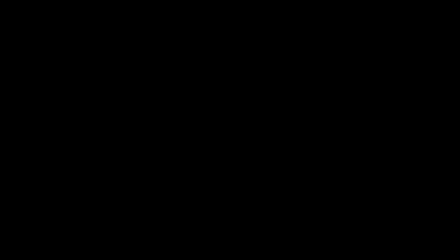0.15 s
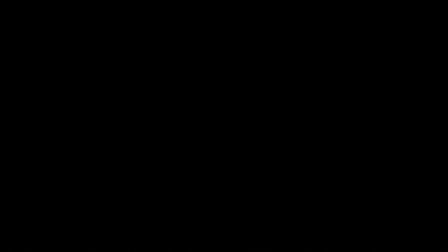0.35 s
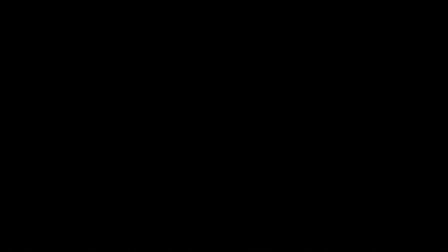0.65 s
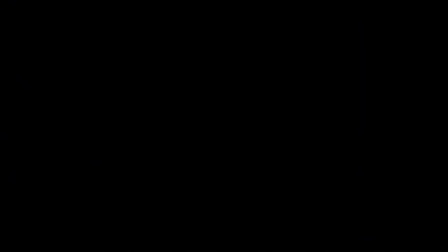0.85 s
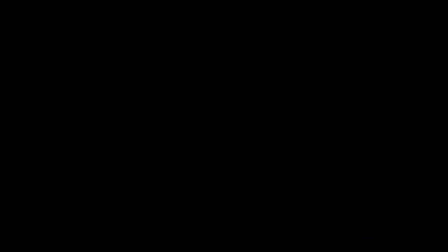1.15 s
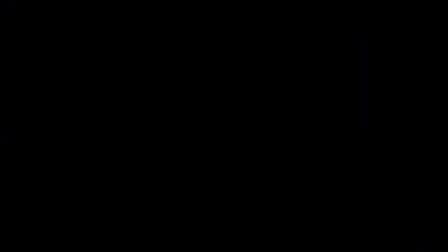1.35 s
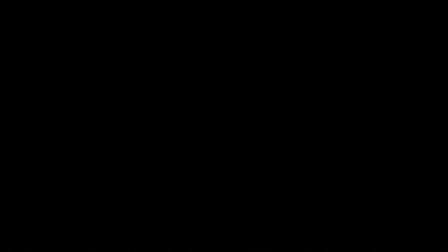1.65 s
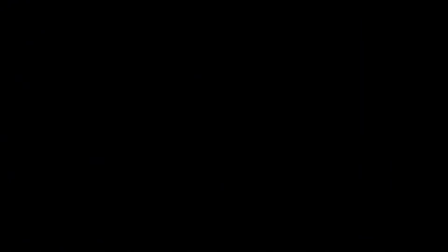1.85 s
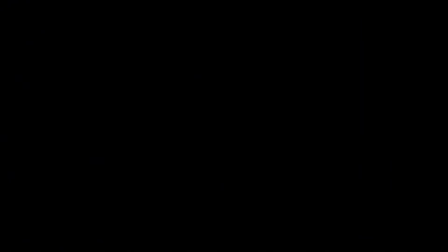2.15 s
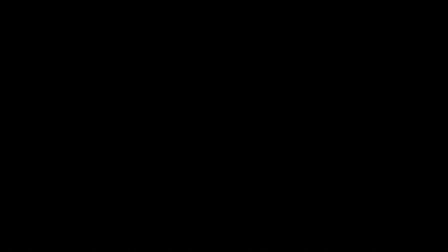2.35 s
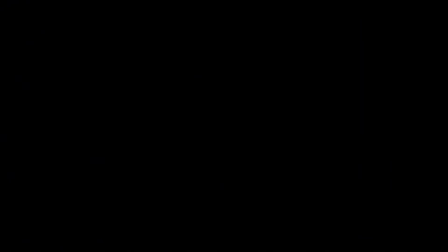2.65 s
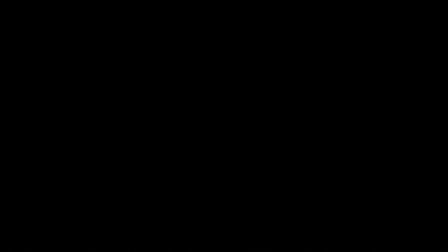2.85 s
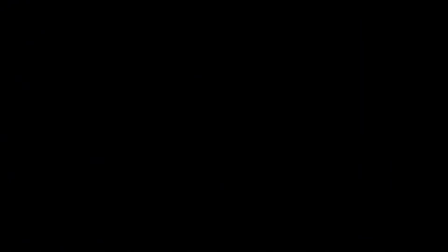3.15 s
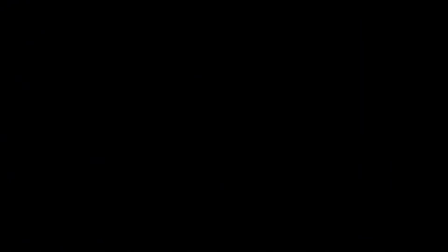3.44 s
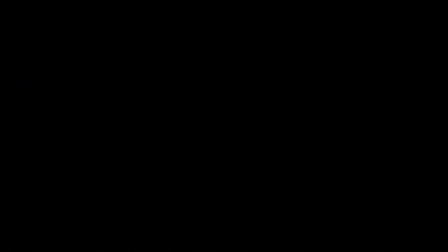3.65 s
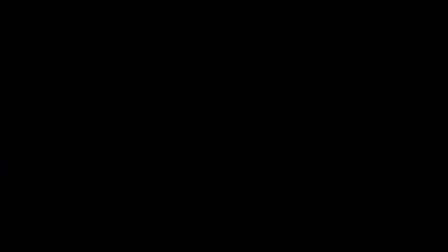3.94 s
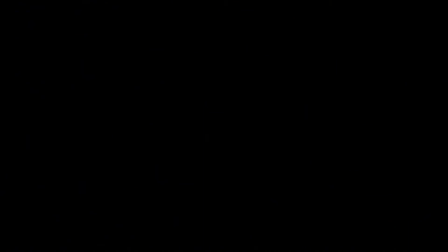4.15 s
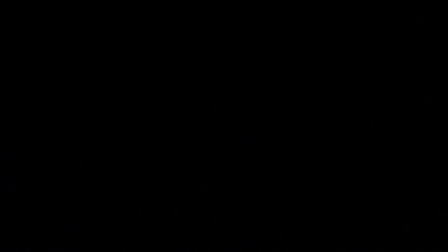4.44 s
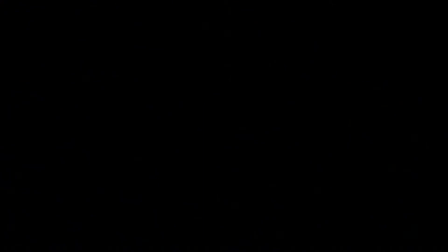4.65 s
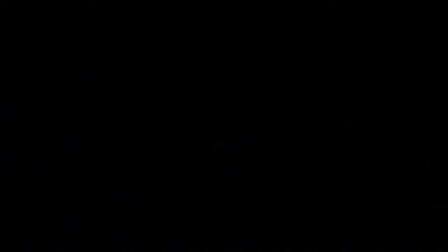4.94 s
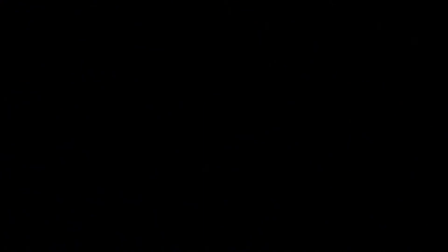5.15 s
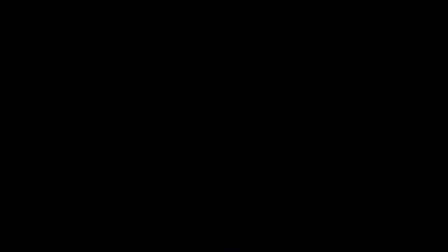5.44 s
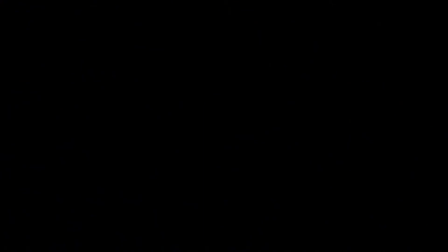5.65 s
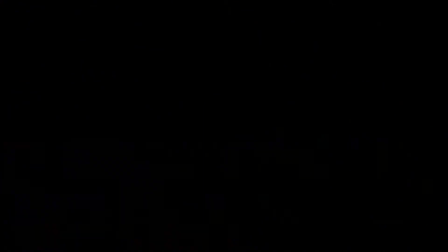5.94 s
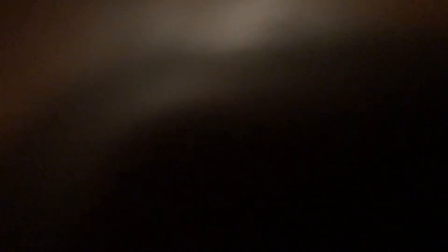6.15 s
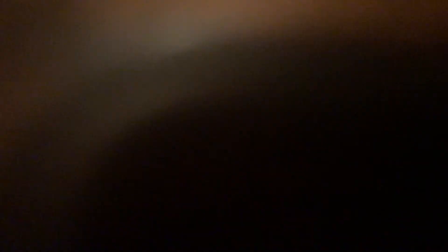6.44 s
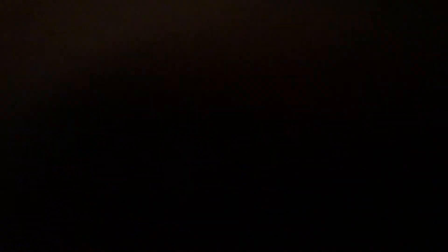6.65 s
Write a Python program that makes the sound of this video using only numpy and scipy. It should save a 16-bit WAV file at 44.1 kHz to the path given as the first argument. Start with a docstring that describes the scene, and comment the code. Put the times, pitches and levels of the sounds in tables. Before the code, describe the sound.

Crisp foil snack packet rustling up close: light crinkles, a hard knock, a brief lull, then bursts of sharp crackling and soft thuds as it opens.

```python
"""A metallized plastic snack bag, handled close to the microphone, then pulled open: its creases snap
one by one, each a click coloured by ringing film, over random finer crackle and sliding hiss.
Early on a knock sets hollow furniture ringing in decaying modes; blows and finger taps are tones that
fall in pitch, some of them soft thuds as the seam gives.
Behind it an appliance hums and rumbles in a small room, over steady noise for the air."""
import sys
import numpy as np
from scipy import signal
from scipy.fft import rfft, irfft
from scipy.io import wavfile

SR = 44100
rng = np.random.default_rng(int(sys.argv[2]) if len(sys.argv) > 2 else 0)


def wrap_up_sound(samples):
    """Save the sound to the file named by the first command line argument, as 16-bit audio."""
    columns = np.atleast_2d(samples).T
    # keep every value between -1 and 1, then stretch to whole-number steps
    tamed = np.clip(columns, -1, 1)
    steps = np.round(tamed * 32767).astype(np.int16)
    wavfile.write(sys.argv[1], SR, steps)


N = 299880
TIME = np.arange(N) / SR
GRAIN_SAMPLES = 1024
GRAIN_HZ = np.fft.rfftfreq(GRAIN_SAMPLES, 1 / SR)
KNOCK_S = .8829


# The loudest creases snapping, close to the microphone. Each row: time in seconds, level of the crack
# in dB, body and fizz in dB relative to the crack, before the trims.
SNAPS = [(0.0652, -24.5, -6, 12.5), (0.098, -30, -2, -1), (0.3165, -33, -11, 9), (0.475, -23.5, 2.5, 2),
         (0.513, -29.5, 8, 9), (0.673, -38, 17.5, 14), (0.8819, -27.5, 17.5, -2), (0.9025, -41, 4, -17),
         (0.9448, -37, 8, -1), (0.9527, -42, 10, -18), (1.269, -56, 15, -15), (1.3137, -25.5, -2, 7),
         (1.4117, -23.5, -9, 7), (1.4467, -24.5, -1, 7), (1.4728, -24.5, 7, 7), (1.4964, -24, -15, 12),
         (1.5669, -26.5, 4, 5), (1.6584, -22.5, 5, -11), (1.8388, -27.5, 4, 3), (1.875, -28, -9, 1),
         (2.126, -17, -9, -11), (2.1371, -22, -2, 1), (2.151, -15.5, 0.5, 5), (2.2422, -29, 5, 3),
         (2.274, -28, -13, -10), (2.3502, -28.5, -13, 12), (2.369, -23.5, -2.5, -8), (2.423, -20, -11, -4),
         (2.4324, -17.5, -14, 5), (2.4553, -23, -9, -10), (2.4645, -18, -2, 1), (2.5214, -18, -21, -15),
         (2.525, -17, -13, 11), (2.617, -19, 0, 6), (2.6811, -22, 1, -1), (2.711, -14.5, -23, 8),
         (2.733, -19, -5, 13.5), (2.856, -17, 1, 6), (2.8719, -17.5, 6, -11), (2.8807, -15, -4, -4),
         (2.9105, -12, -19, 4), (2.9756, -23.5, -2, 12), (3.0323, -24.5, 3, 7), (3.081, -23, -6, 4),
         (3.118, -35, 13, -15), (3.1672, -31, 13.5, -12), (3.2022, -25.5, -3, 7), (3.3867, -26, 17, -6),
         (3.3948, -17.5, 5.5, 1), (3.436, -23.5, -14, 8), (3.4948, -21.5, -18, 14), (3.5054, -25, 7.5, -12),
         (3.5697, -20, -17, 5), (3.588, -18, 4, -15), (3.6, -21.5, -1, 9), (3.6304, -19.5, -2, 0),
         (3.6549, -16, 2, -1), (3.6614, -19.5, 0, 3), (3.7179, -20, -26, -3), (3.725, -18, -6, 6),
         (3.7976, -22.5, 6, -5), (3.9669, -21.5, 5, 6), (4.072, -31, 8, 2), (4.163, -26, -14, -6),
         (4.2057, -21.5, -2, 7), (4.2362, -21.5, 4.5, 5), (4.282, -16.5, -7, 3), (4.3255, -20.5, 7, -3),
         (4.338, -18, 0, 6), (4.4302, -24, -17, -8), (4.436, -23.5, -5, 6), (4.5082, -15, -8, 1),
         (4.528, -21.5, -9, -4), (4.5322, -23.5, 5.5, -2), (4.653, -23, -12, -12), (4.6738, -32, 14, -15),
         (4.7145, -23, -1, -8), (4.762, -37, 18, -17), (4.8224, -36.5, -2, -5), (4.8643, -28, 1, -18),
         (4.876, -32, 8.5, -17), (4.921, -28.5, -11, -9), (5.0295, -29, 6.5, -5), (5.1193, -27.5, 5.5, -7),
         (5.1596, -22.5, 0, -9), (5.168, -24.5, 1, -20), (5.174, -19.5, -14, -1), (5.2201, -20.5, 6, -2),
         (5.256, -17.5, -3, 4), (5.2823, -22.5, 0, 1), (5.3228, -15.5, -12, 11), (5.3354, -16.5, 3, 6),
         (5.3472, -13.5, -10, -7), (5.395, -22, -8, -21), (5.4592, -31, -7, -14), (5.4776, -22, 2, -12),
         (5.5276, -22.5, 2.5, -4), (5.554, -19, 0.5, -1), (5.563, -23.5, -16, 5), (5.6032, -21.5, -28, 4),
         (5.7956, -16.5, -7, 10), (5.804, -18, -12, 9), (5.8474, -13, -2, 11), (5.8733, -17.5, 0, 11),
         (5.928, -27.5, -2, 16), (5.941, -26.5, 11, 18), (5.9502, -22, 3, 12), (5.9636, -26, 0, 16),
         (5.977, -19.5, 1, 16), (5.9954, -20, 4, 16), (6.0125, -29, 15, 24), (6.0388, -34.5, 15, 27),
         (6.0534, -27.5, 11.5, 12), (6.1395, -18.5, 5, 13.5), (6.1964, -30.5, 9.5, 9),
         (6.2642, -36, 14.5, -4), (6.3722, -31, 11, 14), (6.4615, -48, -6, 31), (6.479, -27.5, 5, 10),
         (6.4917, -27, 13.5, 14), (6.52, -19, -6, 11), (6.5282, -14.5, -24, 16.5), (6.736, -33, 7, -9)]
# How near the microphone the film is worked. Each row: time in seconds, share of close colour (0-1).
CLOSENESS = [(0, 1), (.85, 0.8), (1.0, 0.01), (5.6, 0), (5.8, .95), (6.8, 0.76)]
# The fold being worked. Each row: time in seconds, central ring pitch of its facets in Hz,
# fizz of its metal coat in the crackle in dB, before the trim.
FOLD = [(0, 2589, 10.5), (.85, 2581, 4), (.95, 3270, -10.5), (1.3, 3710, 0), (1.75, 3740, 2.5),
        (2.15, 3962, 3.5), (2.9, 3888, 4), (3.7, 3729, 3.5), (4.3, 3190, 2), (4.55, 3080, 2),
        (4.9, 3010, -2), (5.08, 3187, 2), (5.24, 3523, -17), (5.34, 3470, 0), (5.47, 3516, 0),
        (5.76, 3513, 5), (5.8, 3101, 6), (5.95, 2235, 10.5), (6.43, 2257, 12), (6.53, 2242, 11),
        (6.8, 2290, 10)]


def snaps(body_trim_db=-0.5, fizz_trim_db=0, ring_db=7, close_ring_db=-14, pitch_spread=.07):
    """Large creases ring near the pitch of the fold; those right at the microphone hardly ring."""
    out = np.zeros(N)
    level_samples = .004 * SR  # levels are crack energy averaged over 4 ms
    for s, db, body_db, fizz_db in SNAPS:
        close = follow(CLOSENESS, s)[0]
        fold_hz = follow(FOLD, s)[0]
        hz = fold_hz * np.exp(pitch_spread * rng.standard_normal())
        snap = crease(hz, close, body_db + body_trim_db, fizz_db + fizz_trim_db,
                      ring_db + close * close_ring_db, ring_width_hz=650, scatter_s=0.00078,
                      scatter=1.06, lag_s=0.00077, panel_db=7, panel_width_hz=41)
        add(out, s, amp(db) * np.sqrt(level_samples) * snap)
    return out


# Colour of the film. Each row: frequency in Hz, relative level in dB per Hz.
FILM = [(50, -29), (120, -8.5), (350, -9), (600, -9.5), (1400, -5.5), (2500, -0.5), (3700, 0), (5600, -6.5),
        (8000, -8), (9600, -24), (11000, -32.5), (12300, -38.5), (13200, -28.5), (15650, -28), (16000, -13)]
# Film worked right at the microphone sounds flatter.
# Each row: frequency in Hz, dB added to the film's colour at full closeness.
SEAM = [(500, 3), (1500, 1), (2400, -1.5), (3700, -3), (5600, 3.5), (8000, -1.5), (9600, 3.5), (11000, 10),
        (12300, 13), (13200, 4), (15500, 1.5)]


def crease(ring_hz, close, body_db, fizz_db, ring_db, ring_width_hz, scatter_s, scatter, lag_s,
           panel_db=8, panel_width_hz=110):
    """A crease buckles: a click, scatter among nearby folds, the ring of its facet and its panel."""
    body, crack, fizz = registers(GRAIN_HZ)
    t = np.arange(GRAIN_SAMPLES) / SR
    # the scatter gathers for a moment before it dies
    echoes = rng.standard_normal(len(t)) * np.sqrt(t) * np.exp(-t / scatter_s)
    impulse = (t == 0) * rng.choice([-1, 1])
    push = rfft(impulse + scatter * echoes / np.linalg.norm(echoes))

    film = amp(read(FILM, GRAIN_HZ) + close * read(SEAM, GRAIN_HZ))
    panel = resonance(GRAIN_HZ, 220 * 6 ** rng.random(), panel_width_hz, panel_db)
    facet = resonance(GRAIN_HZ, ring_hz, ring_width_hz, ring_db)
    # resonances and scatter colour each register but leave its energy as it is
    gain = 0
    for db, share, ring in [(body_db, body, panel), (0, crack, facet), (fizz_db, fizz, 1)]:
        plain_size = np.linalg.norm(film * share)
        ringing_size = np.linalg.norm(film * share * ring * push)
        gain = gain + amp(db) * share * ring * plain_size / ringing_size
    gain = gain * film / np.linalg.norm(film * crack)

    # minimum phase: the ring follows the click
    log_gain = np.log(np.r_[gain, gain[-2:0:-1]] + 1e-9)
    causal = np.exp(np.conj(signal.hilbert(log_gain)))[:len(gain)]
    # bending waves are slower at low pitch, so the body arrives just after the crack
    lag = 2 * np.pi * np.cumsum(lag_s * body) * GRAIN_HZ[1]
    click = irfft(push * causal * np.exp(-1j * (lag - lag[-1])))
    return np.roll(click, 8) * signal.windows.tukey(len(t), .01) * np.sqrt(len(t) / 2)


def registers(hz, body_hz=1400, fizz_hz=9000):
    """Shares of body (whole panels flexing), crack and fizz (the metal coat) at each frequency."""
    body = 1 / (1 + (hz / body_hz) ** 4)
    fizz = 1 - 1 / (1 + (hz / fizz_hz) ** 14)
    return body, 1 - body - fizz, fizz


def resonance(hz, centre_hz, width_hz, db):
    """Gain of a flat response plus one resonant peak, db relative to the flat part."""
    return 1 + amp(db) / (1 + (2 * (hz - centre_hz) / width_hz) ** 2)


def crackle(body_trim_db=-1, fizz_trim_db=1, per_s=1300, smooth_s=0.059, rub_share=0.16,
            close_rub_share=0.33):
    """The bed of fine crackle and sliding film; harder handling buckles more creases."""
    crack_gain, body_gain = handling()
    close = follow(CLOSENESS, TIME)[0]
    fizz_db = follow(FOLD, TIME)[1]
    # per_s is the mean rate away from the microphone at a crackle level of -33 dB
    effort = (crack_gain / amp(-33)) ** .4
    rate = per_s * avalanches(close) * effort * (1 + 1.6 * close)
    spectrum = rfft(small_creases(rate, close))
    shares = registers(np.fft.rfftfreq(N, 1 / SR))
    body, crack, fizz = (irfft(spectrum * share, N) for share in shares)

    # level out the slow swells, so that the handling alone sets them
    window = signal.windows.hann(int(2 * smooth_s * SR))
    power = signal.fftconvolve(crack ** 2, window / window.sum(), "same")
    strength = np.sqrt(abs(power) + 1e-9)

    # part of the fizz is the smooth hiss of film sliding on film, heard best from close by
    sliding = rfft(noise(FILM))
    hiss = irfft(sliding * shares[2], N) / np.std(irfft(sliding * shares[1], N))
    rub = np.clip(rub_share + close_rub_share * close, 0, 1)
    top = np.sqrt(1 - rub) * fizz / strength + np.sqrt(rub) * hiss

    bright = crack / strength + amp(fizz_db + fizz_trim_db) * top
    return crack_gain * bright + body_gain * amp(body_trim_db) * body / strength


def avalanches(close, clump_db=5.5, close_clump_db=-3.0, clump_s=.006):
    """Rate factor: one buckling sets off others, in runs with lulls; film rubbed close by is steadier."""
    memory = np.exp(-1 / (clump_s * SR))
    stress = evened(signal.lfilter([1], [1, -memory], rng.standard_normal(N)))
    runs = amp((clump_db + close * close_clump_db) * stress)
    return runs / runs.mean()


def small_creases(rate, close, pitch_spread=.22, spread_db=4.0, close_spread_db=-0.1, largest=6.16,
                  count=40):
    """Random bucklings, a few much larger than the rest, each on one facet of the fold being worked."""
    size_db = (spread_db + close * close_spread_db) * np.minimum(rng.exponential(1, N), largest)
    sizes = amp(size_db) * (rng.random(N) < rate / SR)
    pitches = np.geomspace(1400, 6500, count)
    spread = pitch_spread * (1 + close) * rng.standard_normal(N)
    wanted_hz = follow(FOLD, TIME)[0] * np.exp(spread)
    facet = np.minimum(np.searchsorted(pitches, wanted_hz), count - 1)
    near = rng.random(N) < close
    out = np.zeros(N)
    for k, hz in enumerate(pitches):
        for is_near in (False, True):
            body_luck, fizz_luck = rng.standard_normal(2)
            grain = crease(hz, is_near, 3 * body_luck - 1, 3 * fizz_luck - 1, ring_db=7.0,
                           ring_width_hz=1360, scatter_s=0.00097, scatter=1.78, lag_s=0.00081)
            out += signal.oaconvolve(sizes * (facet == k) * (near == is_near), grain)[:N]
    return out


# Each squeeze or pull of the hands. Each row: time of its peak in seconds, crackle level in dB,
# rise in seconds, fall in seconds, body at the peak in dB relative to the crackle, before the trim.
SQUEEZES = [(0.07, -40.5, 0.021, 0.12, -10), (0.48, -34, 0.055, 0.14, 3), (1.289, -39, 0.0031, 0.067, 5),
            (1.413, -29.5, .014, 0.073, 8.5), (1.49, -32, 0.065, 0.14, 6.5), (1.67, -41.5, 0.016, 0.19, 12),
            (1.87, -35.5, 0.036, 0.16, 8.5), (2.06, -28.5, 0.05, 0.11, 4), (2.135, -23.5, 0.063, 0.072, 3),
            (2.369, -28.5, 0.039, 0.077, -0.5), (2.46, -30, 0.12, 0.38, 6.5),
            (2.701, -26.5, 0.11, 0.083, 2.5), (2.875, -19, 0.07, 0.082, 1),
            (2.991, -30.5, 0.092, 0.12, 6.5), (3.398, -28, 0.011, 0.1, 9), (3.595, -30.5, 0.024, 0.11, 9),
            (3.736, -26.5, 0.016, 0.064, 8.5), (3.779, -30.5, 0.052, 0.06, 9.5),
            (3.909, -33.5, 0.087, 0.2, 7.5), (4.201, -31.5, 0.08, 0.036, 5),
            (4.334, -24.5, 0.079, 0.056, 6.5), (4.421, -28.5, 0.05, 0.035, 8.5),
            (4.56, -34, 0.032, 0.052, 0), (4.68, -36, 0.09, 0.03, 6.5), (4.768, -38.5, 0.011, 0.016, 11),
            (4.93, -38, 0.0075, 0.024, 9), (5.22, -44.5, 0.065, .1, 12), (5.338, -25.5, 0.043, 0.066, 6.5),
            (5.388, -25.5, 0.036, 0.027, 7.5), (5.555, -38, 0.08, 0.048, 8), (5.64, -41.5, 0.027, 0.13, 10),
            (5.801, -24.5, 0.019, 0.015, 4.5), (5.856, -20.5, 0.035, 0.064, 6),
            (5.979, -29.5, 0.061, 0.084, 12), (6.532, -30, 0.04, 0.065, 6),
            (6.744, -43.5, 0.0072, 0.064, 13)]
# A squeeze lies this far below its peak one rise before and one fall after it;
# with an exponent over 1, the top is rounded.
SQUEEZE_DROP_DB, SQUEEZE_ROUNDING = -11.5, 1.34
# Faint rustle of the bag held between squeezes. Each row: time in seconds, crackle level in dB.
HOLDING = [(0, -47), (.12, -44), (.86, -45), (.91, -53), (1.06, -58.5), (1.08, -68.5), (1.275, -65.5),
           (1.3, -45.5), (1.65, -41.5), (2.3, -51.5), (3.25, -36.5), (4.08, -46), (4.72, -46.5),
           (4.83, -53), (4.99, -50.5), (5.06, -40), (6.2, -46), (6.48, -44), (6.72, -59)]
HOLDING_BODY_DB = 7.5


def handling(slack_body_db=3):
    """Crack and body gain over time: squeezes swell and relax, duller while the film is slack."""
    crack = amp(follow(HOLDING, TIME)[0]) ** 2
    body = crack * amp(HOLDING_BODY_DB) ** 2
    for s, db, rise_s, fall_s, body_db in SQUEEZES:
        away = np.maximum((s - TIME) / rise_s, (TIME - s) / fall_s)
        near = away < 5
        drop_db = SQUEEZE_DROP_DB * abs(away[near]) ** SQUEEZE_ROUNDING
        power = amp(db + drop_db) ** 2
        slack = np.minimum(away[near], 1)
        crack[near] += power
        body[near] += power * amp(body_db + slack_body_db * slack) ** 2
    return np.sqrt(crack), np.sqrt(body)


def nearby_surface(x, delay_s=0.00111, echo=0.22):
    """Until the knock the bag lies by a hard surface, whose quick echo gives a hollow colour."""
    delayed = np.interp(TIME - delay_s, TIME, x)
    return x + echo * (TIME < KNOCK_S) * delayed


# Heavy blows on the furniture and the bag. Each row: time in seconds, peak in dB before roughness,
# start pitch in Hz, time in which the pitch halves, rise and decay, all three in seconds.
THUDS = [(0.8831, 0, 591, 0.0034, 0.0022, 0.01), (0.927, -11, 221, 0.0056, 0.0014, 0.0071),
         (0.945, -14, 132, 0.029, .004, 0.011), (5.626, -21, 184, 0.013, 0.018, 0.01),
         (5.704, -11.5, 218, 0.019, 0.013, 0.0071), (5.737, -22, 179, 0.042, 0.0046, 0.012),
         (5.778, -17, 490, 0.0046, 0.00059, 0.012), (5.813, -18.5, 450, 0.0032, 0.0015, 0.011),
         (5.899, -20.5, 149, 0.032, .01, 0.0055)]
# Fingers tapping the wall of the bag.
# Each row: time in seconds, peak in dB before roughness, start pitch in Hz.
TAPS = [(0.025, -29, 297), (0.188, -38.5, 254), (0.812, -28, 280), (0.861, -27.5, 401), (2.893, -27, 267),
        (3.393, -32, 297), (3.921, -26, 277), (4.675, -31, 336), (6.034, -18, 590), (6.35, -28.5, 258),
        (6.569, -33, 127), (6.741, -29, 398), (6.774, -30, 328)]
TAP_HALVING_S, TAP_RISE_S, TAP_DECAY_CYCLES = .075, 0.0017, 3.8


def thuds():
    """Heavy blows dive into the bass; light finger taps hardly sag and die within a few cycles."""
    out = np.zeros(N)
    for s, db, *shape in THUDS:
        add(out, s, amp(db) * blow(*shape, rough=0.24))
    for s, db, hz in TAPS:
        tap = blow(hz, TAP_HALVING_S, TAP_RISE_S, TAP_DECAY_CYCLES / hz, rough=0.88)
        add(out, s, amp(db) * tap)
    return out


def blow(hz, halving_s, rise_s, decay_s, rough, rough_hz=130, rough_onset_s=0.0091):
    """A bending wave arrives: a quick fall in pitch, high part first, growing uneven as it dies."""
    t = np.arange(SR // 5) / SR
    turns = hz * halving_s * np.log1p(t / halving_s)
    swell = (1 - np.exp(-(t / rise_s) ** 2)) * np.exp(-t / decay_s)
    lowpass = signal.butter(2, rough_hz, fs=SR, output="sos")
    judder = evened(signal.sosfilt(lowpass, rng.standard_normal((2, len(t)))))
    # the two judders shake both strength and phase
    growth = 1 - np.exp(-t / rough_onset_s)
    uneven = 1 + rough * growth * (judder[0] + 1j * judder[1])
    return swell / swell.max() * (uneven * np.exp(2j * np.pi * turns)).imag


# Modes of the hollow furniture when knocked. Each row: frequency in Hz, level in dB before
# the build-up, time to fall by 60 dB in seconds.
FURNITURE = [(80.7, -16, 0.45), (121.7, -7, 0.3), (186, -14.5, 0.35), (267, -26.5, 0.35),
             (376, -36.5, 0.24), (850, 10.5, 0.012), (1550, 1, 0.01)]


def furniture(build_cycles=2.1):
    """The panels ring on after the knock; low modes take longest to build up."""
    out, t = np.zeros(N), np.arange(SR) / SR
    for hz, db, t60 in FURNITURE:
        build = 1 - np.exp(-t * hz / build_cycles)
        decay = amp(db - 60 * t / t60)
        add(out, KNOCK_S, decay * build * np.sin(2 * np.pi * hz * t))
    return out


# Decay of the small room. Each row: frequency in Hz, time to fall by 60 dB in seconds.
ROOM = [(150, 0.69), (1000, 0.23), (4000, 0.31), (9000, 0.1), (16000, 0.065)]


def room(x, gap_s=0.0006):
    """A faint diffuse tail, each band dying at its own speed."""
    hz, t, z = signal.stft(rng.standard_normal(SR // 2), SR, nperseg=256)
    band_decay = amp(-60 * t / read(ROOM, hz)[:, None])
    tail = signal.istft(z * band_decay, SR)[1]
    # the tail fades in just after the direct sound
    tail *= 1 - np.exp(-(np.arange(len(tail)) / SR / gap_s) ** 2)
    return signal.fftconvolve(x, tail / np.linalg.norm(tail))[:N]


# Lines of the appliance hum. Each row: mean frequency in Hz, rms in dB relative to the hum level.
HUM = [(118.4, 0.5), (350, -14)]
# Hum level as the bag shields it more or less. Each row: time in seconds, level in dB.
HUM_LEVEL = [(0, -58.5), (1.3, -57.5), (2.6, -51.5), (3.0, -45.5), (5.4, -44.5), (6.1, -53.5), (6.8, -44)]
# Rumble that grows with the hum. Each row: frequency in Hz, relative level in dB per Hz.
RUMBLE = [(20, -50), (45, -16.5), (80, 3.5), (130, -7), (250, -8), (800, -57), (4000, -88.5)]
# Air of the room. Each row: frequency in Hz, relative level in dB per Hz.
AIR = [(30, -23), (70, 6), (150, -2), (400, -10.5), (1300, -16), (3900, -13.5), (8000, -23.5), (11000, -39),
       (16000, -34)]


def background(air_db=-63, rumble_db=-3, waver=0.092):
    """The appliance's slightly unsteady hum and rumble over the air of the room."""
    wander = noise([(1, 0), (4, -4), (12, -30), (40, -120)])  # slow: Hz, relative dB per Hz
    hum = 0
    for hz, db in HUM:
        phase = 2 * np.pi * hz * TIME + waver * wander * hz / HUM[0][0]
        hum = hum + amp(db) * np.sqrt(2) * np.sin(phase)
    appliance = hum + amp(rumble_db) * noise(RUMBLE)
    return amp(follow(HUM_LEVEL, TIME)[0]) * appliance + amp(air_db) * noise(AIR)


def noise(points):
    """Steady noise of a given spectrum, rms 1."""
    white = rfft(rng.standard_normal(N))
    colour = amp(read(points, np.fft.rfftfreq(N, 1 / SR)))
    return evened(irfft(white * colour, N))


def amp(db):
    """Decibels to gain."""
    return 10 ** (np.asarray(db) / 20)


def evened(x):
    """Scales to rms 1."""
    return x / np.sqrt(np.mean(x ** 2) + 1e-20)


def read(points, hz):
    """Reads a frequency table on a log-frequency axis."""
    f, value = np.transpose(points)
    return np.interp(np.log(hz + 1), np.log(f + 1), value)


def follow(table, s):
    """Every column of a curve table at the times s."""
    at, *columns = np.transpose(table)
    return [np.interp(s, at, c) for c in columns]


def add(mix, s, sound):
    """Mixes a sound in at time s."""
    part = mix[max(round(s * SR), 0):][:len(sound)]
    part += sound[:len(part)]


def scene():
    """The bag close by, the room around it, and blows reaching the microphone through the furniture."""
    bag = nearby_surface(snaps() + crackle())
    return (bag + amp(-15.0) * room(bag) + thuds() + furniture() + background())[None]


def record(dry, ceiling=.86, edge_hz=15880):
    """The loudest peaks are rounded off below the ceiling; then a low-pass sets the band limit."""
    rounded = dry / (1 + (dry / ceiling) ** 8) ** (1 / 8)
    lowpass = signal.firwin(511, edge_hz, window=("kaiser", 9), fs=SR)
    return signal.oaconvolve(rounded, lowpass[None], "same")


dry = scene()
out = record(dry)
wrap_up_sound(out)
```